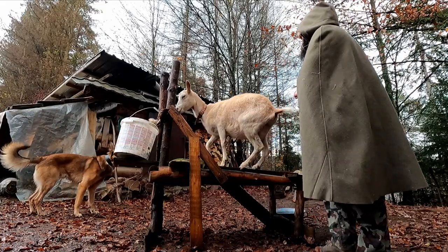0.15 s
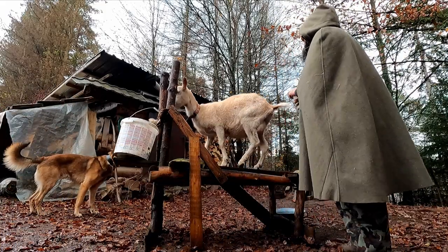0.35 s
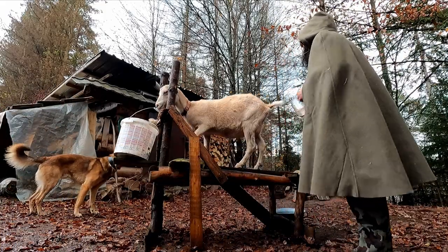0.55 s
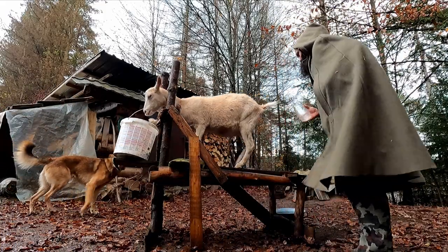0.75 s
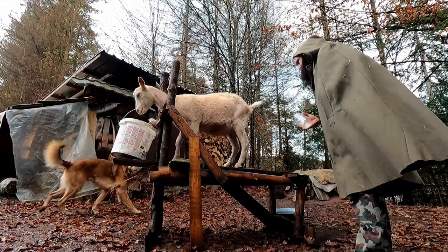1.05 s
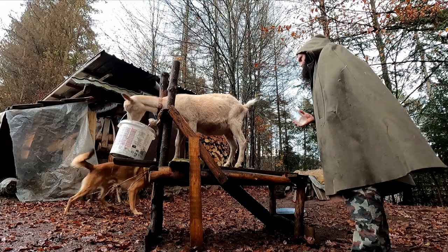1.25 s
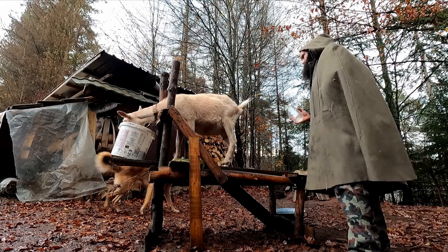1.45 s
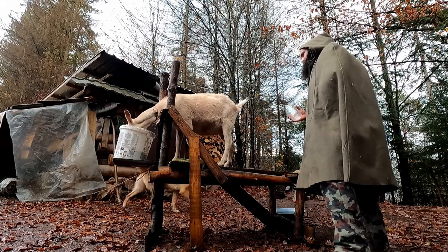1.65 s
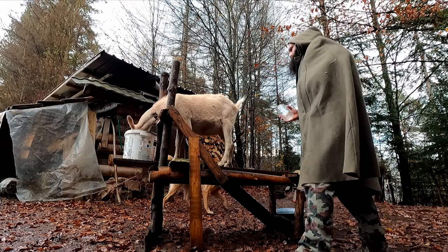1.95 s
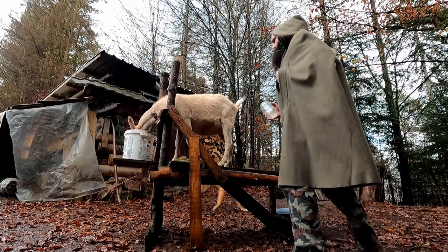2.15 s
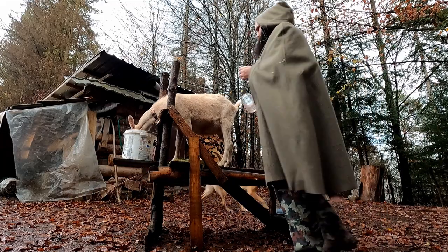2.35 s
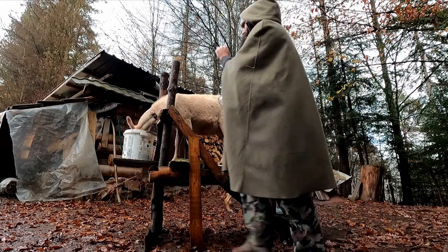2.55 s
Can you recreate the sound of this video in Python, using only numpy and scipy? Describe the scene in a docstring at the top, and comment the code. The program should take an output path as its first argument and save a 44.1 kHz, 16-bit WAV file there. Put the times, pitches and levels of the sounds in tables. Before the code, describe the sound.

Hooves knock unevenly on ringing planks as a goat steps about on a wooden stand in a farmyard, with two faint bird whistles. Louder clatters follow as it nudges a plastic bucket, over a light rustle of dry leaves.

```python
"""A farmyard. A goat steps about on a wooden milking stand: its hooves thump, knock and scuff, the planks
ring and a loose bar clacks. It pushes its muzzle into a plastic feed bucket, which rattles against the
stand: the wall clatters and cracks, the hollow booms. Dry leaves crackle underfoot, a heavy cloak swishes
and a bird whistles twice, faintly, over a rush of air and a low rumble."""
import sys
import numpy as np
from scipy import signal
from scipy.fft import rfft, irfft
from scipy.io import wavfile
from scipy.ndimage import uniform_filter1d

SR = 44100
rng = np.random.default_rng(int(sys.argv[2]) if len(sys.argv) > 2 else 0)


def digitize_waveform(pressure):
    """Quantize a signal to 16-bit integers and store it at the path in sys.argv[1].

    Rows of a 2-D input are taken as channels; values are limited to [-1, 1].
    """
    field = np.atleast_2d(pressure).T
    bounded = np.clip(field, -1, 1)
    quanta = np.round(bounded * 32767).astype(np.int16)
    wavfile.write(sys.argv[1], SR, quanta)


N = 119070
TIME_S = np.arange(N) / SR

# hoof contacts: start_s, length_s, thump_db, knock_db, scuff_db, ring_db (thump, ring before trim)
HOOF_STEPS = [(0.115, 0.0073, -56, -76, -57, -73), (0.169, 0.0041, -32, -39.5, -51, -26.5),
              (0.184, 0.0059, -32.5, -65, -81, -23.5), (0.197, 0.0076, -31.5, -31.5, -48, -41),
              (0.23, 0.012, -36.5, -43.5, -50, -56), (0.322, 0.011, -37.5, -39.5, -41.5, -50),
              (0.339, 0.0047, -30, -40, -46, -55), (0.36, .006, -41, -50, -56, -39),
              (0.471, 0.0068, -56, -52, -46.5, -52), (0.495, 0.0074, -42.5, -61, -47, -68),
              (0.544, 0.0057, -48, -67, -53.5, -65), (0.585, 0.018, -36, -49, -59, -66),
              (0.612, 0.011, -38, -60, -59, -71), (0.656, .006, -38.5, -68, -54.5, -78),
              (0.766, 0.019, -38, -52, -61.5, -44.5), (0.866, 0.0095, -27, -32, -42, -36),
              (0.891, 0.031, -35, -49.5, -58, -42), (1.005, 0.0051, -39, -38.5, -75, -61),
              (1.02, 0.023, -35.5, -48.5, -84, -43.5), (1.177, 0.02, -42.5, -55.5, -70, -58)]
# loose bar of the stand: start_s, level_db
BAR_CLACKS = [(0.477, -54), (0.4997, -34)]
# bucket contacts: start_s, length_s, body_db, crack_db, boom_db
BUCKET_KNOCKS = [(1.368, 0.01, -31.5, -53, -44), (1.394, 0.024, -31, -64, -74),
                 (1.406, .006, -19, -31.5, -38.5), (1.417, 0.011, -36, -44, -42.5),
                 (1.439, 0.0034, -31, -63, -52.5), (1.476, 0.0016, -48, -57, -60),
                 (1.483, 0.0023, -34, -54.5, -49.5), (1.496, 0.0049, -45, -58, -50),
                 (1.597, 0.017, -44.5, -59, -74), (1.603, 0.0088, -39, -62, -65),
                 (1.625, 0.0032, -31.5, -45, -56), (1.629, 0.005, -45, -66, -57),
                 (1.671, 0.0025, -55, -67, -62), (1.681, 0.02, -46.5, -67, -44.5),
                 (1.757, 0.0027, -50.5, -61, -66), (1.789, 0.0041, -28, -42, -50),
                 (1.794, 0.001, -26.5, -41.5, -53), (1.815, 0.0013, -22.5, -31.5, -47.5),
                 (1.837, 0.005, -22.5, -29.5, -38.5), (1.85, 0.008, -37.5, -55, -37),
                 (1.873, 0.0084, -35.5, -52, -43.5), (1.896, 0.0051, -37.5, -47, -47),
                 (1.905, .007, -25, -36.5, -43), (1.945, 0.0089, -32.5, -50.5, -36.5),
                 (1.957, 0.011, -41.5, -68, -39.5), (2.066, .009, -42.5, -67, -49),
                 (2.088, 0.0051, -19.5, -31.5, -36), (2.096, 0.0041, -18.5, -32, -36),
                 (2.117, 0.0052, -43, -39, -32), (2.124, 0.017, -22.5, -33.5, -34),
                 (2.141, 0.009, -19.5, -28.5, -37.5), (2.162, 0.0047, -24.5, -37.5, -40),
                 (2.172, 0.016, -29.5, -38, -39), (2.234, 0.012, -34.5, -47.5, -49),
                 (2.259, .004, -47, -45, -52)]
# cloak swishes: centre_s, half_length_s, level_db
CLOAK_SWISHES = [(1.37, 0.08, -57.5), (2.036, 0.032, -74), (2.436, .035, -57)]
# bird whistles: start_s, length_s, start_hz, middle_hz, end_hz, level_db
BIRD_CALLS = [(0.586, .108, 2600, 3300, 2540, -56), (1.095, 0.045, 3000, 2840, 2700, -59)]

# resonant modes: freq_hz, gain_db, t60_s
STAND_MODES = [(43, -20, 0.62), (128, -22, 0.3), (169, -15, 0.21), (228.4, 1.5, 0.18), (341.5, -13.5, 0.16),
               (493.4, -13.5, 0.15), (611, -22, 0.19), (690, -16, 0.18), (950, -22.5, 0.49),
               (1230, -41, .2)]
BAR_MODES = [(397, 0.5, .16), (481, -2, 0.067), (540, -9.5, 0.14), (1486, 1.5, 0.097), (1540, -22, .05),
             (1970, -9, 0.067), (2520, -10, 0.056), (2670, -4.5, 0.041), (3250, -23, .04)]
BUCKET_WALL_MODES = [(997, 19.5, 0.063), (1179, 9.5, 0.16), (1480, -4, .12), (1850, 0, .12),
                     (1955, -12, .13), (2070, -12, .1), (2370, -4, .08), (2480, -9, .1), (4000, -6, 0.087),
                     (3800, -14, 0.076)]
BUCKET_HOLLOW_MODES = [(235.7, -31, 0.27), (411, -40, .12), (655, -41, 0.19)]

# source spectra: freq_hz, relative_db
HOOF_THUMP_EQ = [(25, -26), (60, -10.5), (110, -6.5), (190, 0.5), (300, -4), (450, -17), (900, -26),
                 (3000, -97)]
HOOF_KNOCK_EQ = [(100, -5.5), (350, 0), (540, 2), (670, 8), (950, 0), (1280, 7.5), (1550, 2.5), (1750, -4),
                 (2400, -3.5), (3100, -16), (6000, -29), (14000, -74)]
HOOF_SCUFF_EQ = [(500, -46), (2200, 9), (2780, 16.5), (3300, 4), (5000, 8), (7000, 2), (9000, -9.5),
                 (12500, -14), (15500, -33)]
BUCKET_BODY_EQ = [(100, -58), (250, -22.5), (550, -23.5), (800, -3.5), (1150, 0), (1600, 0.5), (1880, 5.5),
                  (2400, 1), (2750, -6), (3200, -15.5), (4100, -39), (5000, -42), (12000, -52)]
BUCKET_CRACK_EQ = [(1000, -17), (3000, 0.5), (3700, 3.5), (4150, 6), (4750, -4), (5400, -4), (7000, -11.5),
                   (8700, -21.5), (12000, -25.5), (15500, -56)]
BUCKET_BOOM_EQ = [(40, -16.5), (100, -10.5), (165, -6.5), (205, -6), (233, 5.5), (265, -0.5), (330, -4),
                  (450, -7.5), (700, -7.5), (1200, -15), (4000, -71)]
BUMP_EQ = [(25, 0), (70, 2.5), (170, 3.5), (400, -6.5), (700, -17), (1500, -20), (7000, -34.5),
           (14000, -55)]
LEAF_EQ = [(300, 7), (800, 7), (1500, 6), (2400, 7.5), (3300, 0.5), (5200, 2.5), (7300, -4.5), (9000, -19),
           (12500, -18.5), (15500, -61)]
CLOAK_EQ = [(800, -25), (2500, -8), (4200, -3), (5300, -1), (7200, -6), (9000, -13), (13000, -23),
            (15500, -40)]
AIR_EQ = [(15, -29), (50, -27), (100, -0.5), (200, 10), (330, -1), (600, -14), (1400, -1), (2700, -15),
          (3500, -12), (8000, -15), (14000, -33)]
RUMBLE_EQ = [(12, -10), (28, -2.5), (43, 5), (60, -3), (100, -20.5), (200, -27), (600, -59)]

# level envelopes: time_s, gain_db
LEAF_ENVELOPE = [(0, -55), (.3, -52.5), (.45, -51.5), (.62, -52), (.8, -57), (.92, -48.5), (1.0, -57),
                 (1.12, -50.5), (1.23, -54.5), (1.38, -44), (1.55, -51.5), (1.73, -57), (1.93, -58),
                 (2.06, -39.5), (2.33, -53.5), (2.44, -44), (2.54, -46), (2.7, -48.5)]
RUMBLE_ENVELOPE = [(0, -40.5), (.08, -60), (.33, -46.5), (.46, -71), (.65, -51.5), (.9, -54), (1.05, -51.5),
                   (1.26, -67), (1.5, -64), (1.78, -88), (1.95, -61), (2.2, -61), (2.45, -57.5), (2.7, -62)]


def hooves():
    """Hooves thump, knock and scuff the planks; the frame rings and a loose bar clacks."""
    start_s, length_s, thump_db, knock_db, scuff_db, ring_db = np.transpose(HOOF_STEPS)
    ring_trim_db, thump_trim_db = -1, -6
    frame = ring(clicks(start_s, ring_db + ring_trim_db), STAND_MODES)
    thump_force = contacts(start_s, length_s, thump_db + thump_trim_db)
    thump = struck(thump_force, HOOF_THUMP_EQ, tail_db=-5, t60_s=0.16)
    knock = struck(contacts(start_s, length_s, knock_db), HOOF_KNOCK_EQ, tail_db=-5, t60_s=0.16)
    scuff = struck(contacts(start_s, length_s, scuff_db), HOOF_SCUFF_EQ, tail_db=-6, t60_s=0.17)
    bar = ring(clicks(*np.transpose(BAR_CLACKS)), BAR_MODES)
    return frame + thump + knock + scuff + bar


def bucket():
    """The plastic wall clatters and cracks against the stand; the hollow booms and rings on."""
    start_s, length_s, body_db, crack_db, boom_db = np.transpose(BUCKET_KNOCKS)
    wall_trim_db = -27.5
    body = struck(contacts(start_s, length_s, body_db), BUCKET_BODY_EQ, tail_db=-5, t60_s=0.16)
    crack = struck(contacts(start_s, length_s, crack_db), BUCKET_CRACK_EQ, tail_db=-5.5, t60_s=0.21)
    boom_force = contacts(start_s, length_s, boom_db)
    boom = struck(boom_force, BUCKET_BOOM_EQ, tail_db=-5, t60_s=0.21)
    hollow = ring(boom_force, BUCKET_HOLLOW_MODES)
    wall = ring(clicks(start_s, body_db + wall_trim_db), BUCKET_WALL_MODES)
    return body + crack + boom + hollow + wall


def bump():
    """One soft, dull contact with no ring."""
    return colour(contacts(starts_s=[1.549], lengths_s=[0.0028], levels_db=[-36]), BUMP_EQ)


def leaves():
    """Dry leaves underfoot: random crackles of uneven size over hiss."""
    crackles_per_s, size_spread_db = 2700, 8
    crackle_mix_db, hiss_mix_db = -11, -8
    sizes = from_db(size_spread_db * np.minimum(rng.exponential(1, (2, N)), 5))
    signs = rng.choice([-1, 1], (2, N))
    crackles = sizes * signs * (rng.random((2, N)) < crackles_per_s / SR)
    hiss = from_db(hiss_mix_db) * rng.standard_normal((2, N))
    rustle = from_db(crackle_mix_db) * crackles / crackles.std() + hiss
    return colour(spread(rustle, width_db=-9.5), LEAF_EQ) * envelope(LEAF_ENVELOPE)


def cloak():
    """Heavy cloth slides over itself in soft swells."""
    swells = sum(from_db(level_db) * np.exp(-((TIME_S - centre_s) / half_length_s) ** 2)
                 for centre_s, half_length_s, level_db in CLOAK_SWISHES)
    return swells * stereo_noise(CLOAK_EQ, width_db=-19)


def bird():
    """Thin, wavering whistles: one arches in pitch, one falls."""
    waver_share = 0.0197
    out = np.zeros(N)
    for start_s, length_s, start_hz, middle_hz, end_hz, level_db in BIRD_CALLS:
        progress = np.clip((TIME_S - start_s) / length_s, 0, 1)
        parabola = np.polyfit([0, 0.5, 1], [start_hz, middle_hz, end_hz], 2)
        pitch_hz = np.polyval(parabola, progress) * (1 + waver_share * wander(smooth_samples=50))
        swell = np.sqrt(np.abs(np.sin(np.pi * progress)))
        out += from_db(level_db) * swell * np.sin(2 * np.pi * np.cumsum(pitch_hz) / SR)
    return out


def outdoor_air():
    """A faint, uneven rush of air over a low rumble."""
    air_db, flutter_db = -61, 4
    air_gain = from_db(air_db + flutter_db * wander(smooth_samples=1800))
    air = air_gain * stereo_noise(AIR_EQ, width_db=-19)
    rumble = envelope(RUMBLE_ENVELOPE) * stereo_noise(RUMBLE_EQ, width_db=-53.5)
    return air + rumble


def contacts(starts_s, lengths_s, levels_db):
    """Contact forces: each a click and a short gritty scrape, spectrally flattened."""
    grit_db, rise_share = 5.5, 0.19
    click_gain, click_reference_s = 0.56, 0.0044
    energy_window_s = 0.01  # level_db is the RMS of a contact's energy spread over this span
    lead_samples = 64
    time_s = TIME_S[:4096]
    out = np.zeros(N + SR)
    for start_s, length_s, level_db in zip(starts_s, lengths_s, levels_db):
        grit = rng.standard_normal(len(time_s)) * from_db(grit_db * rng.standard_normal(len(time_s)))
        rise = 1 - np.exp(-time_s / (rise_share * length_s))
        fall = np.exp(-(time_s / length_s) ** 4)
        force = unit_energy(grit * rise * fall)
        force[0] += click_gain * min(click_reference_s / length_s, 2)  # shorter contact, harder click
        spectrum = rfft(np.roll(force, lead_samples))
        smoothed_power = uniform_filter1d(np.abs(spectrum) ** 2, size=70)
        flat_force = unit_energy(irfft(spectrum / np.sqrt(smoothed_power)))
        first = int(start_s * SR) - lead_samples
        out[first:first + len(time_s)] += flat_force * from_db(level_db) * np.sqrt(energy_window_s * SR)
    return out[:N]


def clicks(starts_s, levels_db):
    """One impulse per blow."""
    out = np.zeros(N)
    out[(np.asarray(starts_s) * SR).astype(int)] = from_db(levels_db)
    return out


def struck(force, eq, tail_db, t60_s):
    """A struck body: broad resonances plus a dying tail."""
    direct = colour(force, eq)
    return direct + tail(direct, tail_db, t60_s, width_db=-5)


def ring(force, modes):
    """A force drives one damped resonator per mode."""
    out = np.zeros(N)
    for freq_hz, gain_db, t60_s in modes:
        radius = from_db(-60 / (t60_s * SR))
        step_rad = 2 * np.pi * freq_hz / SR
        feedback = [1, -2 * radius * np.cos(step_rad), radius ** 2]
        out += from_db(gain_db) * signal.lfilter([0, np.sin(step_rad)], feedback, force + 1e-18)
    return out


def tail(x, level_db, t60_s, width_db):
    """Dense stereo decay of weak modes and near reflections."""
    time_s = TIME_S[:SR]
    rise = 1 - np.exp(-time_s / 0.001)
    decay = from_db(-60 * time_s / t60_s)
    pair = [unit_energy(noise * decay * rise) for noise in rng.standard_normal((2, SR))]
    response = spread(pair, width_db)
    return from_db(level_db) * signal.fftconvolve(np.atleast_2d(x), response, axes=1)[:, :N]


def colour(x, eq):
    """Minimum-phase filter; keeps the power of white noise."""
    size = 2 ** 18
    freq_hz, relative_db = np.transpose(eq)
    bins_hz = np.arange(size // 2 + 1) * SR / size
    gain = from_db(np.interp(np.log(bins_hz + 1), np.log(freq_hz), relative_db))
    cepstrum = irfft(np.log(gain))
    cepstrum[1:size // 2] *= 2  # fold onto positive time
    cepstrum[size // 2 + 1:] = 0
    response = unit_energy(irfft(np.exp(rfft(cepstrum))))
    return irfft(rfft(x, size) * rfft(response))[..., :N]


def stereo_noise(eq, width_db):
    """Steady coloured noise."""
    return colour(spread(rng.standard_normal((2, N)), width_db), eq)


def spread(pair, width_db):
    """Mid and side to left and right."""
    side_gain = from_db(width_db)
    return (pair[0] + side_gain * pair[1] * np.array([[1], [-1]])) / np.sqrt(1 + side_gain ** 2)


def wander(smooth_samples):
    """Smooth random drift, standard deviation 1."""
    drift = uniform_filter1d(rng.standard_normal(N), smooth_samples)
    drift = uniform_filter1d(drift, smooth_samples)
    return drift / drift.std()


def envelope(points):
    """Gain over time, interpolated in dB."""
    return from_db(np.interp(TIME_S, *np.transpose(points)))


def unit_energy(x):
    """Scale to energy 1."""
    return x / np.sqrt(np.sum(x ** 2) + 1e-20)


def from_db(db):
    """Decibels to gain."""
    return 10 ** (np.asarray(db) / 20)


def scene():
    """Hooves, bucket, bump and bird with a faint yard echo, over leaves, cloak and air."""
    left_minus_right_db = -1.2
    pan = from_db(left_minus_right_db * np.array([[0.5], [-0.5]]))
    direct = pan * hooves() + bucket() + bump() + bird()
    yard_echo = tail(direct, level_db=-23, t60_s=0.69, width_db=-8)
    return direct + yard_echo + pan * (leaves() + cloak() + outdoor_air())


def record(dry):
    """Slight left-channel delay, soft clip, low-pass."""
    left_lag_s, ceiling, stopband_hz = 14e-6, 0.6, 15500
    delay = np.exp(-2j * np.pi * np.fft.rfftfreq(N, 1 / SR) * left_lag_s)
    left = irfft(rfft(dry[0]) * delay, N)
    rounded = ceiling * np.tanh(np.array([left, dry[1]]) / ceiling)
    return signal.sosfilt(signal.cheby2(12, 60, stopband_hz, fs=SR, output="sos"), rounded)


dry = scene()
out = record(dry)
digitize_waveform(out)
```